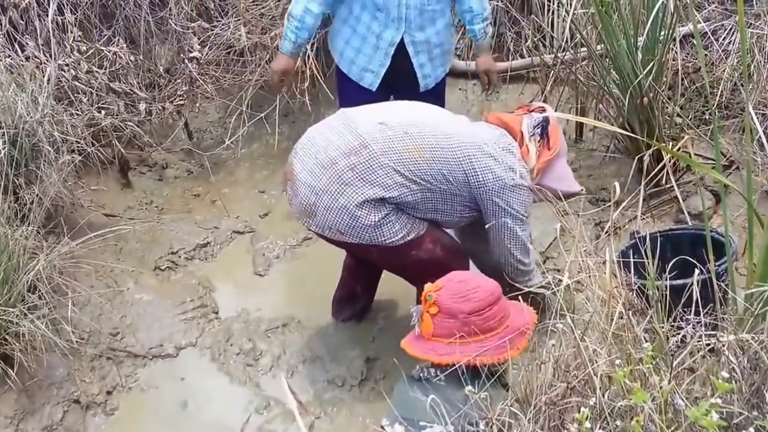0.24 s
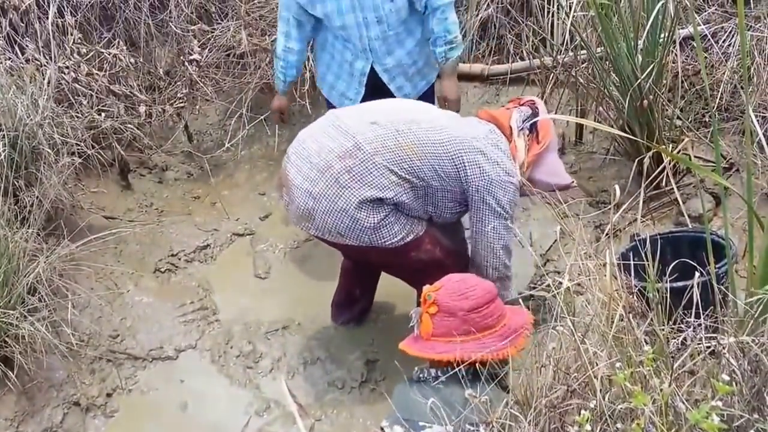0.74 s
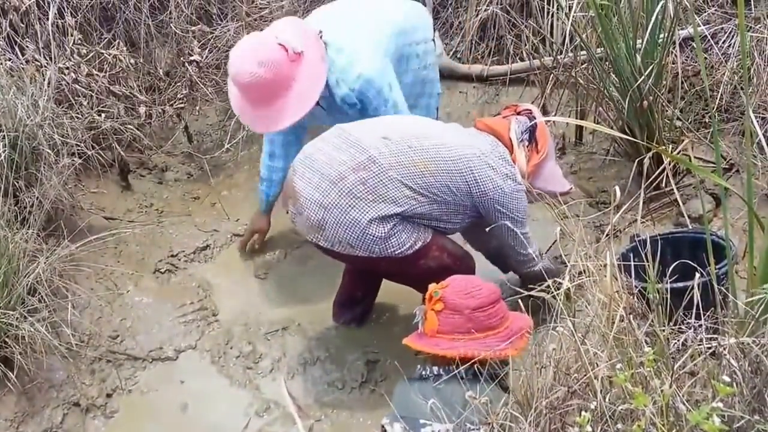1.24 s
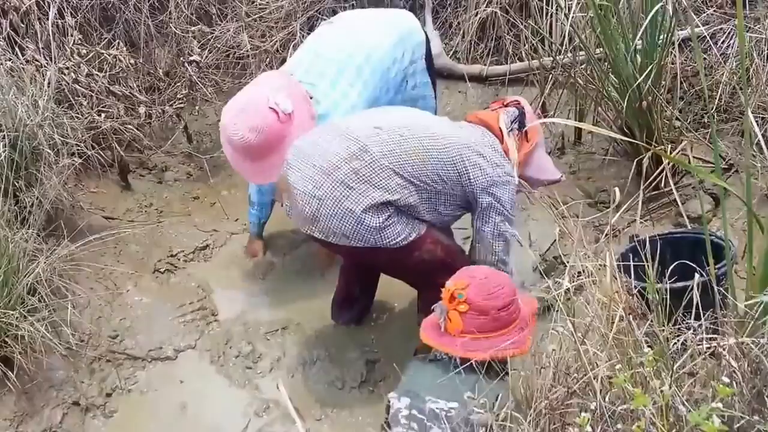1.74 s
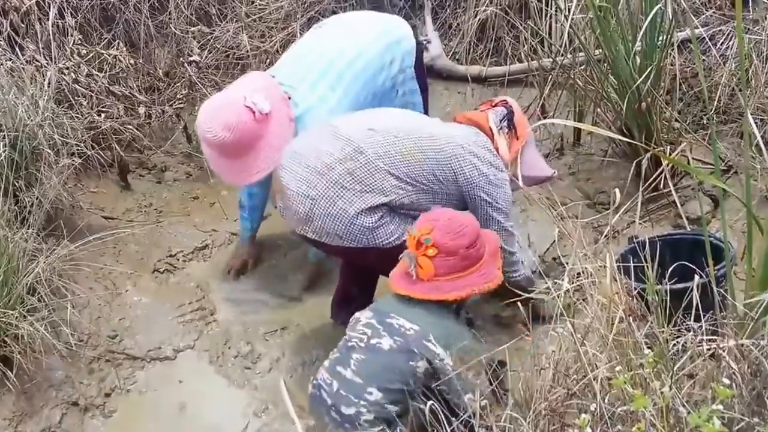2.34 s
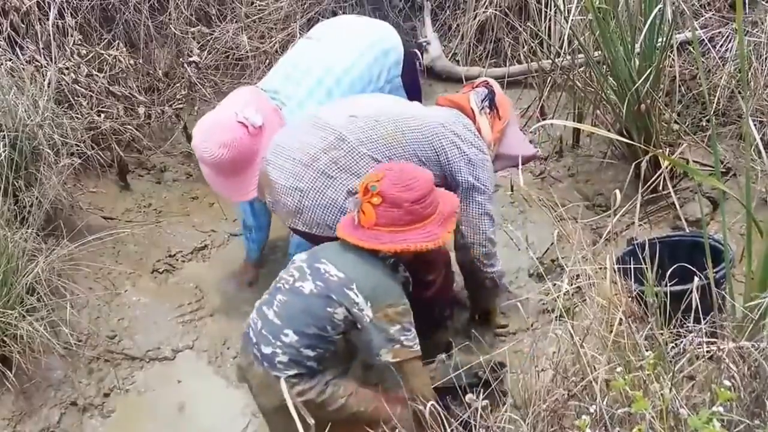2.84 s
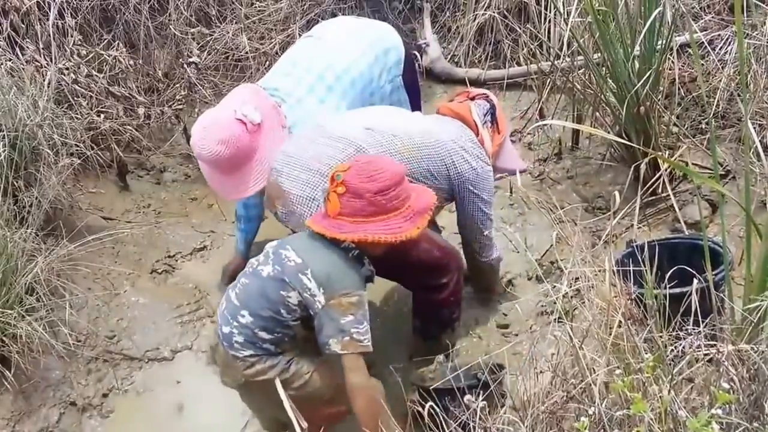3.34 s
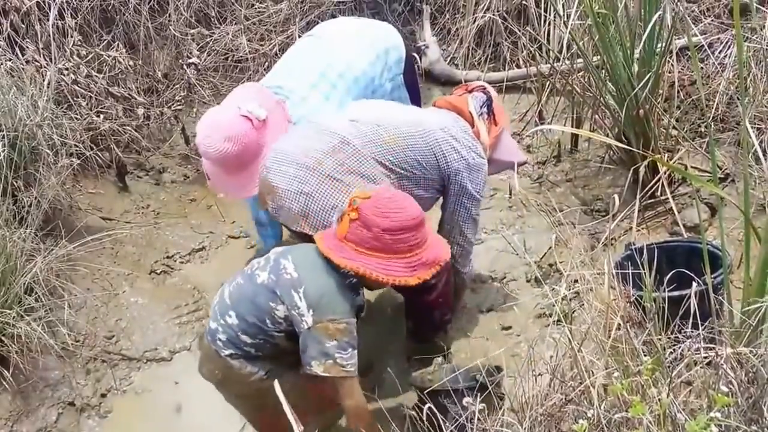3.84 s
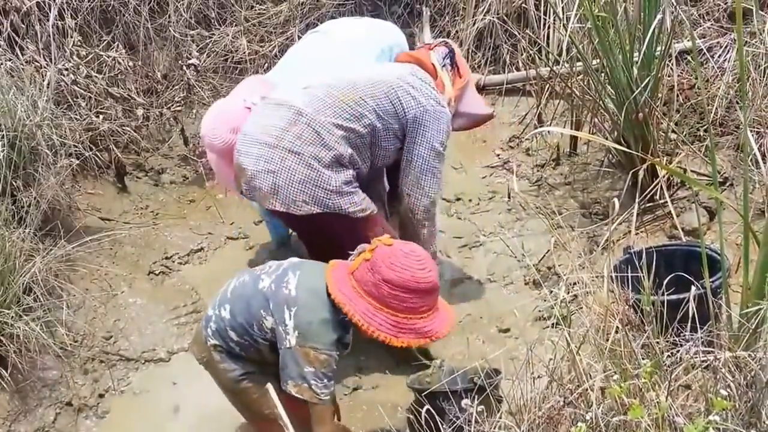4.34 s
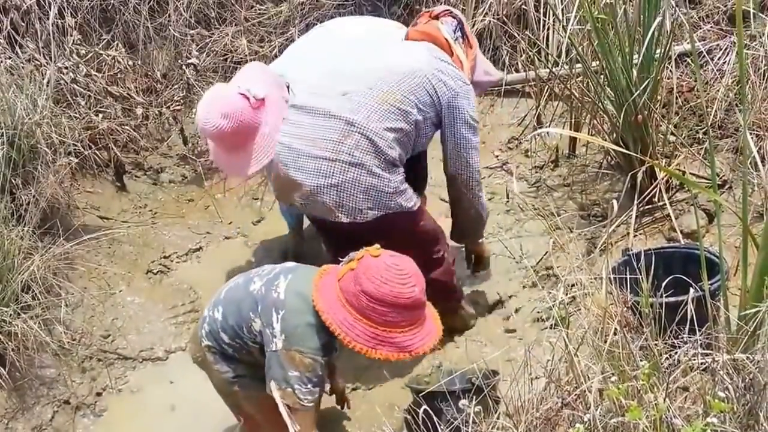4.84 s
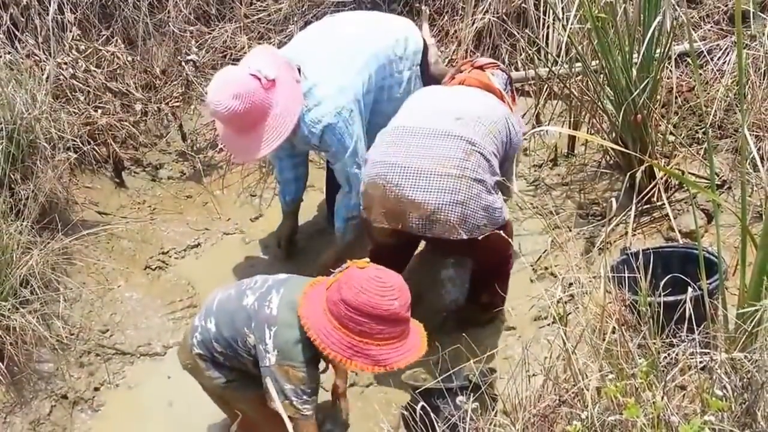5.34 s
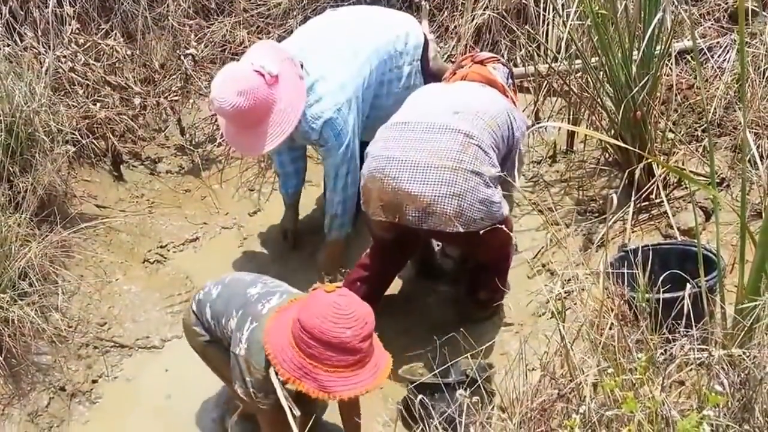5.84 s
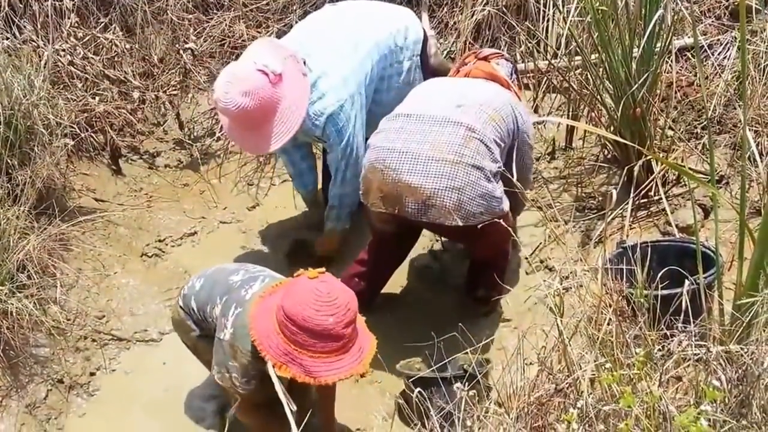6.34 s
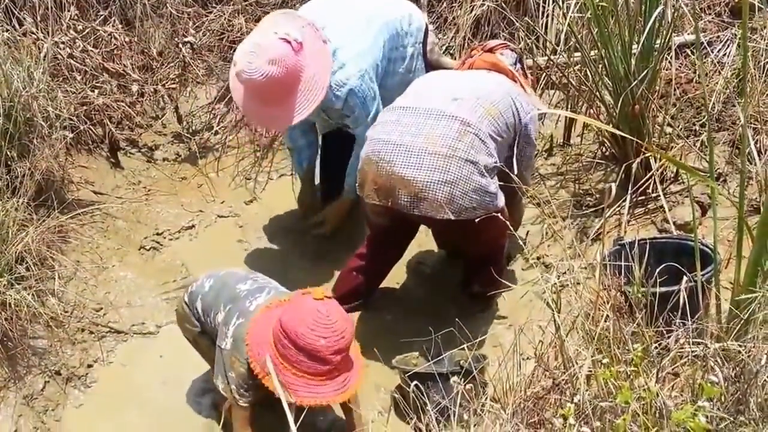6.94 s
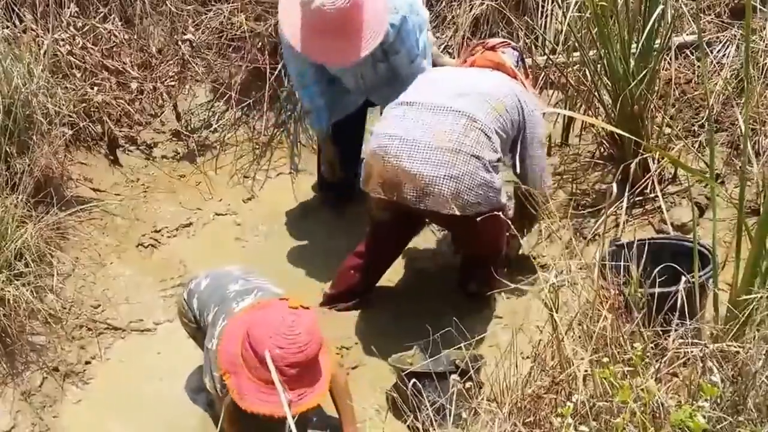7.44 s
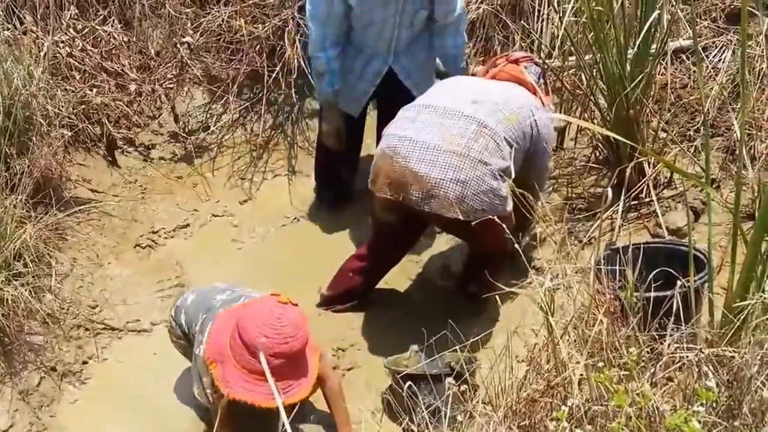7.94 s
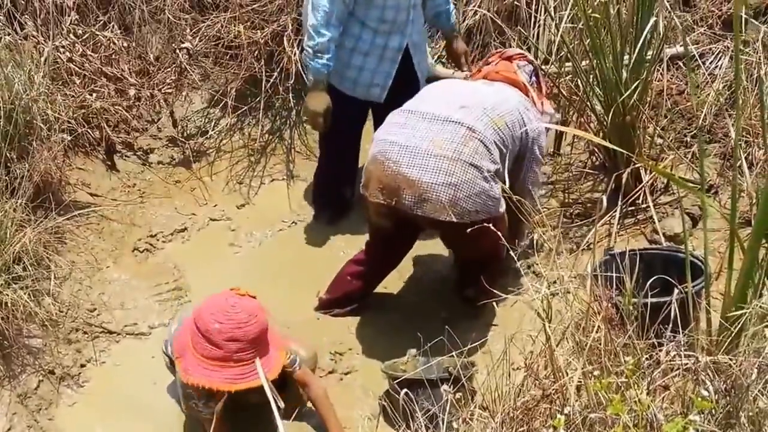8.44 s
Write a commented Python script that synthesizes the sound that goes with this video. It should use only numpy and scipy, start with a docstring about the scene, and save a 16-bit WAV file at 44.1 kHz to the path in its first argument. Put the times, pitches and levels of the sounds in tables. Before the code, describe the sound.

Several people grope with their hands in a shallow muddy pool among dry reeds. Low wind buffets open the sound on the left, then small slops, drips and sticky snaps follow. Stirring grows fuller and splashier around the middle, with gurgling bubbles, then thins into dry rustling and near quiet before a last splash and wind thump. Close stereo microphone outdoors, no echoing room.

```python
"""Hands grope through shallow mud and water in the open, heard close through two microphone ports.
Random gliding bubbles over filtered wash make the slop, bright noise with crackle the fizz and dry reeds.
Listed bursts smack, drip and tick as snaps and rough ringing cavities; air pockets gurgle as gliding sines.
Wind is lumpy low noise with pressure swings on the left port, over a steady bed of open air."""
import sys
import numpy as np
from scipy import signal
from scipy.fft import rfft, irfft, next_fast_len
from scipy.io import wavfile

SR = 44100
rng = np.random.default_rng(int(sys.argv[2]) if len(sys.argv) > 2 else 0)


def put_to_file(sound):
    """Save the sound as 16-bit audio at rate SR, in the file named by the first command-line argument."""
    columns = np.atleast_2d(sound).T  # one column per channel
    safe = np.clip(columns, -1, 1)
    whole_steps = np.round(safe * 32767)
    wavfile.write(sys.argv[1], SR, whole_steps.astype(np.int16))


N = 383669  # length in samples

# Colour of stirred mud and water, whose pockets favour a few bands: hz, gain_db
SLOP_COLOUR = [(350, -15), (620, -2.5), (850, -10), (1200, -0.5), (1600, -4.5), (2200, 1), (2900, -3.5),
               (4100, -7.5), (5400, -6.5), (9000, -17.5)]


def from_db(db):
    """Decibels to amplitude gain."""
    return 10 ** (np.asarray(db) / 20)


def rms_one(x):
    """Scale to rms 1, over both ports together."""
    return x / np.sqrt(np.mean(x ** 2) + 1e-20)


def in_time(rows):
    """Turn table columns into curves, sample by sample; the first column is time in seconds."""
    s, *columns = np.transpose(rows)
    t = np.arange(N) / SR
    return [np.interp(t, s, column) for column in columns]


def colour(x, points, share=1):
    """Filter by a (hz, gain_db) table whose decibels are scaled by share."""
    size = next_fast_len(N + 4096)
    table_hz, table_db = np.transpose(points)
    hz = np.arange(size // 2 + 1) * SR / size
    gain_db = share * np.interp(np.log(hz + 1), np.log(table_hz), table_db)
    return irfft(rfft(x, size) * from_db(gain_db), size)[..., :N]


def drift(rate_hz):
    """Slow random wandering of rms about 1: noise through two equal low-pass poles."""
    step = 40  # samples between drawn points
    pole = np.exp(-2 * np.pi * rate_hz * step / SR)
    noise = rng.standard_normal(N // step + 2002)
    slow = signal.lfilter([1], [1, -2 * pole, pole * pole], noise)[2000:]  # drop the filter's start
    return np.interp(np.arange(N) / step, np.arange(len(slow)), rms_one(slow))


def ring(x, hz, t60_s):
    """A resonance: a unit click sets a decaying sine ringing from height 1."""
    decay = from_db(-60 / (t60_s * SR))
    turn = 2 * np.pi * hz / SR
    return signal.lfilter([0, np.sin(turn)], [1, -2 * decay * np.cos(turn), decay * decay], x + 1e-18)


def add(out, s, piece):
    """Mix a piece in at a time in seconds."""
    i = round(s * SR)
    out[i:i + len(piece)] += piece[:max(N - i, 0)]


def place(out, s, piece, lag_s, pan_db):
    """Set a piece's direction: positive lag delays the left port, positive pan favours it."""
    add(out[0], s + max(lag_s, 0), piece * from_db(pan_db / 2))
    add(out[1], s + max(-lag_s, 0), piece * from_db(-pan_db / 2))


def stirring():
    """Levels (dB) of slop and fizz: calm water, strokes and rustles added as power."""
    # Hand strokes through the water: start_s, length_s, slop_db, spray_db
    strokes = [(0.0, 0.082, -54, -76), (0.14, 0.14, -56.5, -57.5), (0.317, 0.029, -47, -51),
               (0.52, 0.15, -55.5, -59), (0.693, 0.0094, -48.5, -60), (1.105, 0.33, -70, -59.5),
               (1.418, 0.096, -53.5, -59.5), (1.852, 0.025, -44, -56.5), (2.035, 0.085, -56, -54.5),
               (2.414, 0.24, -46, -55.5), (2.733, 0.042, -53, -62), (2.984, 0.041, -61, -53.5),
               (3.211, 0.1, -59, -53.5), (3.356, 0.026, -50.5, -47), (3.413, 0.31, -54, -54),
               (3.767, 0.044, -63, -49.5), (3.854, 0.19, -46.5, -52), (4.065, 0.32, -43.5, -54),
               (4.276, 0.24, -43, -56), (4.563, 0.088, -44.5, -57), (4.66, 0.32, -38.5, -47.5),
               (5.043, 0.072, -37, -44.5), (5.142, 0.069, -35.5, -48.5), (5.292, 0.093, -43, -50),
               (5.566, 0.093, -49.5, -62), (5.713, 0.33, -39.5, -49), (6.116, 0.096, -47.5, -53.5),
               (6.247, 0.096, -50.5, -53), (6.395, 0.11, -43.5, -52.5), (6.539, 0.33, -43.5, -47.5),
               (6.614, 0.014, -33.5, -60), (6.888, 0.11, -57, -51), (7.037, 0.091, -54, -51),
               (8.288, 0.14, -51.5, -53), (8.467, 0.067, -47.5, -47.5)]
    # Dry reeds brushed aside, swelling and fading: peak_s, half_length_s, peak_db
    rustles = [(6.77, 0.09, -45.5), (7.344, 0.096, -46), (7.61, 0.1, -48.5), (7.785, 0.18, -51.5),
               (7.963, 0.06, -43), (8.524, 0.73, -56.5)]
    calm_slop_db, calm_spray_db = -66.5, -64  # water left alone
    rustle_stirs_db = -12  # how far below the rustle the stems move the water
    # rise and drain as for the briefest stroke
    rise_s, sag_db_per_s, drain_db_per_s = 0.0037, 3, 312
    swell_s = 0.18  # a stroke this long moves more water: it drains half as fast and builds four times slower

    t = np.arange(0, N / SR + .004, .002)
    start, length, slop_db, spray_db = np.transpose(strokes)[..., None]
    age = t - start
    slowing = 1 + length / swell_s
    sag_db = sag_db_per_s * np.clip(age, 0, length)
    drain_db = drain_db_per_s / slowing * np.maximum(age - length, 0)
    shape = np.clip(age / rise_s / slowing ** 2, 0, 1) * from_db(-(sag_db + drain_db))

    peak, half, db = np.transpose(rustles)[..., None]
    reeds = from_db(db) * np.exp(-((t - peak) / half) ** 2)

    slosh = [*(from_db(slop_db) * shape), *(from_db(rustle_stirs_db) * reeds), from_db(calm_slop_db) + 0 * t]
    bright = [*(from_db(spray_db) * shape), *reeds, from_db(calm_spray_db) + 0 * t]
    levels_db = [10 * np.log10(np.sum(np.square(parts), axis=0)) for parts in (slosh, bright)]
    return in_time(np.transpose([t, *levels_db]))


def blip(hz, length_s, rise):
    """A bubble swells quickly and rings out while its pitch climbs."""
    u = np.arange(round(length_s * SR)) / (length_s * SR)
    envelope = from_db(-35 * u) * np.minimum(u / 0.15, 1)
    return envelope * np.sin(2 * np.pi * hz * length_s * u * (1 + rise * u))


def bubbles(count):
    """Random droplets and bubbles of many sizes, glides and directions, broken up by churning; rms 1."""
    out = np.zeros((2, N))
    clump = from_db(2.3 * drift(20.0))
    for when, size, length, rise, lag, pan, loud in rng.random((count, 7)):
        hz = 600 * (7000 / 600) ** size
        gain = from_db(-3.0 * np.log(1.11 - loud)) * clump[int(when * N)] * np.sqrt(hz)
        length_s = (.005 + .032 * length ** 2) * (1500 / hz) ** .7  # high bubbles are shorter
        piece = gain * blip(hz, length_s, .18 * rise)
        place(out, when * N / SR, piece, .0003 * (lag - .6), 5.0 * (pan - .5))
    churned = out * (1 + .6 * drift(150.0))
    return rms_one(colour(churned, SLOP_COLOUR))


def slop(level_db):
    """Bubbles stirred up by the hands, and the surging noise of water washing under them."""
    shared, own = rng.standard_normal(N), rng.standard_normal((2, N))
    wash = rms_one(colour(own + shared, SLOP_COLOUR))
    surge = from_db(3.5 * drift(25.0))
    return from_db(level_db - 3.5) * bubbles(count=11000), from_db(level_db - 11) * surge * wash


def fizz(level_db):
    """Spray and reeds: bright hiss, unlike in the two ports, with fine crackle shared by both."""
    # Colour of the spray and reeds: hz, gain_db
    fizz_colour = [(1500, -32), (1700, -4), (2320, 0.5), (6720, -1), (10300, 1.5), (14500, -7)]
    hiss = rng.standard_normal((2, N))
    sizes = from_db(2.4 * np.minimum(rng.exponential(1, N), 5)) * rng.choice([-1, 1], N)
    crackle = rms_one(sizes * (rng.random(N) < 500. / SR))  # about 500 clicks a second
    crackle = np.array([crackle, np.roll(crackle, -7)])  # the right port hears it 7 samples sooner
    flicker = from_db(2.2 * drift(30.0))
    return from_db(level_db) * flicker * rms_one(colour(hiss + from_db(-6.5) * crackle, fizz_colour))


def open_air():
    """A steady bed of filtered noise from the air around, independent in the two ports."""
    # Colour of the open air: hz, gain_db
    air_colour = [(250, -32), (529, 11), (1700, -0.5), (14500, -35.5)]
    return from_db(-61.5) * rms_one(colour(rng.standard_normal((2, N)), air_colour))


def wind():
    """Wind on the ports and far rumble: lumpy low noise, partly shared; gusts lean left."""
    # Level along the take, midway between the ports in dB: time_s, level_db
    wind_levels = [(0.0, -40.5), (0.29, -42), (0.57, -53), (1.21, -48.5), (2.0, -53.5), (2.55, -49),
                   (2.97, -51.5), (4.26, -48.5), (5.51, -45.5), (5.85, -47.5), (7.88, -54.5), (8.25, -50.5),
                   (8.45, -45.5), (8.7, -42.5)]
    # Colour of the low noise: hz, gain_db
    rumble_colour = [(25, -42), (38, -7), (155, 2.5), (249, -5), (450, -15), (700, -44)]
    lull_pan_db = 1.5  # left minus right in lulls
    gust_from_db, gust_leans = -46.5, 2.3  # above this level each dB leans left by so many dB

    level_db, = in_time(wind_levels)
    shared, own = rng.standard_normal(N), rng.standard_normal((2, N))
    lumps = from_db(1.9 * np.array([drift(23.0), drift(16.0)]) + 2.3 * drift(10.0))
    low = rms_one(lumps * colour(shared + 0.59 * own, rumble_colour))
    pan_db = lull_pan_db + gust_leans * np.maximum(level_db - gust_from_db, 0)
    return from_db(level_db + np.outer([.5, -.5], pan_db)) * low


def buffets():
    """Eddies hit the left port: each a smooth pressure swing of a cycle or two with a little flutter."""
    # Eddies: start_s, level_db, swing_hz
    eddies = [(0.02, -17, 137), (0.033, -13.5, 171), (0.051, -13, 99), (0.062, -11.5, 221),
              (0.072, -9.5, 162), (0.164, -11.5, 155), (0.201, -17, 129), (0.3, -18, 115),
              (0.558, -31, 120), (0.908, -26, 135), (0.961, -28.5, 114), (1.005, -33, 148),
              (5.407, -21, 154), (5.432, -21.5, 113), (5.458, -22.5, 151), (5.514, -27, 107),
              (5.576, -16.5, 116), (7.62, -33, 109), (8.35, -32, 118), (8.485, -26.5, 110),
              (8.615, -20, 133), (8.633, -18, 101)]
    rasp_db, peaking = -32.5, 0.21  # turbulent flutter on each swing; how pointed its crest is
    out = np.zeros(N)
    flutter_band = signal.butter(2, [280, 750], "band", fs=SR, output="sos")
    flutter = rms_one(signal.sosfilt(flutter_band, rng.standard_normal(N)))
    for s, db, hz in eddies:
        turns = np.arange(round(3 * SR / hz)) * hz / SR
        rasp = from_db(rasp_db) * flutter[round(s * SR):][:len(turns)]
        phase = 2 * np.pi * (turns - 1.2)
        envelope = np.exp(-((turns - 1.1) / 0.7) ** 2)
        swing = envelope * (np.cos(phase) + peaking * np.cos(2 * phase) + rasp)
        add(out, s, -from_db(db) * swing)
    return out * from_db([[0], [-45]])  # left, right


def gurgles():
    """Escaping air pockets: a bubble's pitch glides as it nears the surface; its ring is rough."""
    # Air pockets, levels before roughening: start_s, length_s, start_hz, end_hz, peak_db
    pockets = [(0.1495, 0.019, 1800, 3300, -47.5), (1.4845, 0.018, 900, 2700, -47),
               (1.917, 0.018, 1100, 2100, -47), (2.53, 0.05, 620, 650, -46), (2.735, 0.036, 890, 1450, -47),
               (3.363, 0.02, 2200, 3100, -42), (4.286, 0.028, 730, 1300, -42.5),
               (5.057, 0.052, 1400, 2100, -38.5), (5.145, 0.04, 1400, 1250, -37),
               (5.741, 0.06, 1200, 1150, -39), (5.874, 0.024, 1200, 1260, -35.5),
               (5.956, 0.034, 550, 1300, -35.5), (6.844, 0.024, 1150, 1250, -41.5),
               (7.118, 0.014, 2000, 3100, -43)]
    out = np.zeros(N)
    for s, length_s, start_hz, end_hz, db in pockets:
        u = np.arange(round(length_s * SR)) / (length_s * SR)
        phase = 2 * np.pi * np.cumsum(start_hz * (end_hz / start_hz) ** u) / SR
        add(out, s, from_db(db) * np.sin(np.pi * u) * np.sin(phase))
    return out * (1 + 0.7 * drift(160.0))


def smacks():
    """A bursting film snaps, then its cavity swells and rings, part rough noise, part climbing sine."""
    # Smacks of mud and water, snap and cavity: start_s, cavity_db, cavity_hz, snap_db
    mud_smacks = [(0.2089, -38, 6000, -32), (0.5427, -31, 3100, -28), (0.628, -44, 4450, -26),
                  (1.1508, -44, 1970, -25.5), (2.0522, -42.5, 2180, -38), (2.2642, -46.5, 3290, -30),
                  (2.5905, -32, 6040, -25), (3.0999, -36.5, 2410, -25.5), (3.381, -34.5, 6150, -38),
                  (3.9564, -35, 5360, -26), (5.0185, -32.5, 3620, -34), (5.153, -37.5, 1340, -31),
                  (5.901, -30.5, 5340, -33), (6.082, -36, 2360, -27)]
    # Drips and plops, a cavity with no snap: start_s, cavity_db, cavity_hz
    drips = [(0.82, -47, 2100), (1.431, -44, 2230), (1.453, -38.5, 3470), (2.437, -31.5, 2260),
             (4.241, -30.5, 1600), (4.288, -40.5, 1000), (4.872, -36, 2020), (4.888, -30.5, 3650),
             (4.903, -30, 2660), (5.369, -31, 2310), (6.578, -30, 2400), (6.988, -39.5, 2700),
             (1.86, -39.5, 1460), (2.08, -42, 4640), (2.413, -38.5, 4130), (2.482, -43.5, 2180),
             (2.527, -34.5, 1296), (2.561, -33.5, 2600), (2.608, -35, 1350), (2.625, -41, 2440),
             (2.775, -41.5, 3270), (3.284, -39, 3630), (3.447, -50, 2550), (3.525, -37, 2080),
             (3.608, -38, 2280), (3.628, -40, 1940), (3.8, -30.5, 5310), (4.031, -38, 4060),
             (4.11, -33, 2370), (4.354, -35, 2130), (4.514, -34, 1080), (4.722, -21.5, 3880),
             (5.173, -28.5, 1893), (5.617, -35, 2730), (5.781, -28, 1840), (6.184, -35.5, 1400),
             (6.269, -35, 1980), (6.52, -36, 1080), (6.597, -33, 1270), (6.788, -33, 2580),
             (6.958, -39, 2950), (7.302, -47, 1000), (7.551, -44.5, 1235), (8.298, -44.5, 2080),
             (8.485, -37.5, 2000)]
    # Thin films and dry stems snapping, no cavity: start_s, snap_db
    ticks = [(0.3206, -29), (0.4837, -20.5), (1.263, -32), (1.4142, -32), (2.139, -26), (2.4428, -26),
             (3.483, -23.5), (3.5753, -21.5), (4.8389, -43), (5.006, -24), (5.0644, -20), (5.125, -23),
             (6.559, -27), (6.7047, -25), (8.5764, -27.5)]
    rows = [*mud_smacks]
    rows += [(*drip, -np.inf) for drip in drips]
    rows += [(s, -np.inf, 1000, db) for s, db in ticks]  # the pitch is silent here

    out = np.zeros((2, N))
    t = np.arange(round(.06 * SR)) / SR
    noise = rng.standard_normal((len(rows), 2, len(t)))
    lags_s = rng.uniform(-.0004, .0001, len(rows))  # mostly sooner at the left port
    high = signal.butter(1, [6000, 14000], "band", fs=SR, output="sos")
    snap_fade = from_db(-60 * t / .01) * np.minimum(t / .0016, 1)
    for (s, db, hz, snap_db), (body, snap), lag_s in zip(rows, noise, lags_s):
        # a torn cavity rings broad, a whole one narrow
        t60_s = (3.5 if np.isfinite(snap_db) else 8.0) / hz
        rough = rms_one(ring(ring(body, hz, t60_s), hz, t60_s))
        climbing = 1.1 * np.sin(2 * np.pi * hz * t * (1 + 9.0 * t))
        swell = t * np.sqrt(hz / 2500) / .0023  # time counted in rises, shorter for high cavities
        envelope = swell ** 2 * np.exp(2 - 2 * swell)  # tallest at one rise
        cavity = from_db(db - 2) * envelope * (rough + climbing)
        crack = from_db(snap_db) * snap_fade * signal.sosfilt(high, snap)
        place(out, s, cavity + crack, lag_s, 0)
    return out


def surroundings(x):
    """Mud bank and bodies scatter the sound differently to each port, as decaying noise echoes."""
    t = np.arange(round(.04 * SR)) / SR
    scatter = rng.standard_normal((2, len(t))) * np.exp(-t / .012)
    scatter /= np.sqrt(np.sum(scatter ** 2, axis=1, keepdims=True))
    return x + from_db(-8) * signal.oaconvolve(x, scatter, axes=1)[:, :N]


def ports(x, share):
    """Opposite filters tilt the ports: the left favours much of the low and middle range, the right the top."""
    # Tilt for sounds from the water, scaled by share; the right port gets the opposite: hz, left_gain_db
    port_tilt = [(60, -4), (180, 25), (550, -2), (1650, 8.5), (4970, 15), (15000, -12.5)]
    return np.array([colour(x[0], port_tilt, share), colour(x[1], port_tilt, -share)])


def scene():
    """Water heard through the two ports, air around, wind on the ports."""
    slop_db, fizz_db = stirring()
    drops, wash = slop(slop_db)
    scattered = surroundings(drops + smacks() + gurgles())
    water = ports(scattered + wash, .45) + ports(fizz(fizz_db), .25)
    return water + open_air() + wind() + buffets()


def record(dry):
    """The microphone drops the deepest bass; a steep filter cuts the top."""
    bass_cut = signal.butter(2, 32, "high", fs=SR, output="sos")
    top_cut = signal.ellip(12, .5, 60, 14550, fs=SR, output="sos")
    return signal.sosfilt(top_cut, signal.sosfilt(bass_cut, dry))


dry = scene()
out = record(dry)
put_to_file(out)
```